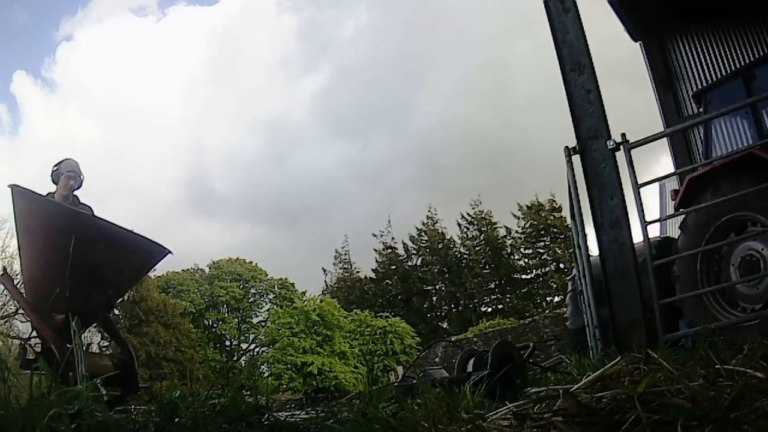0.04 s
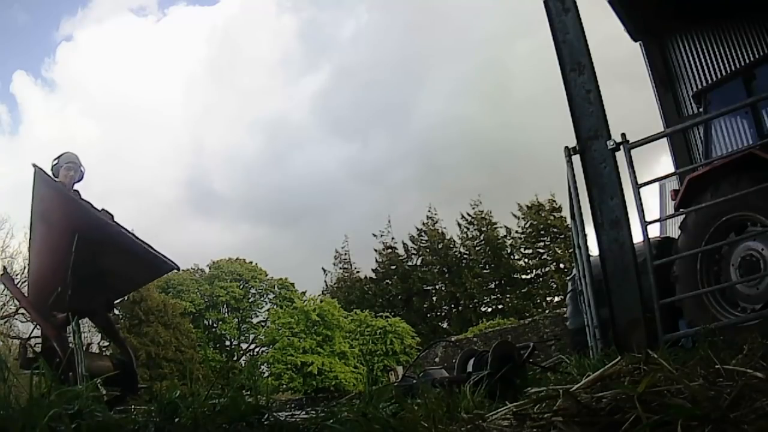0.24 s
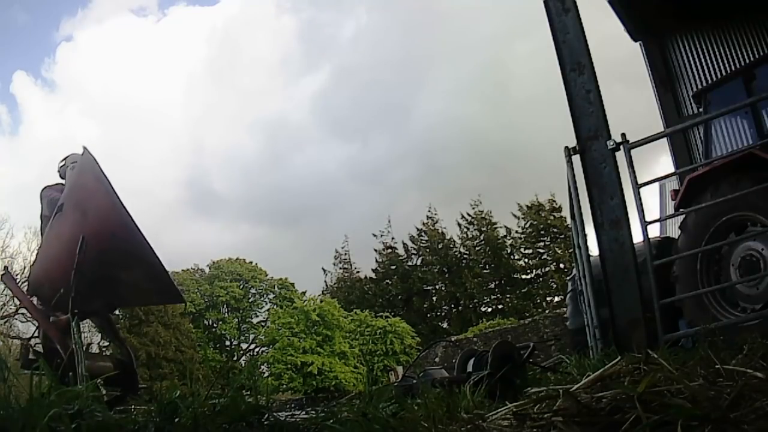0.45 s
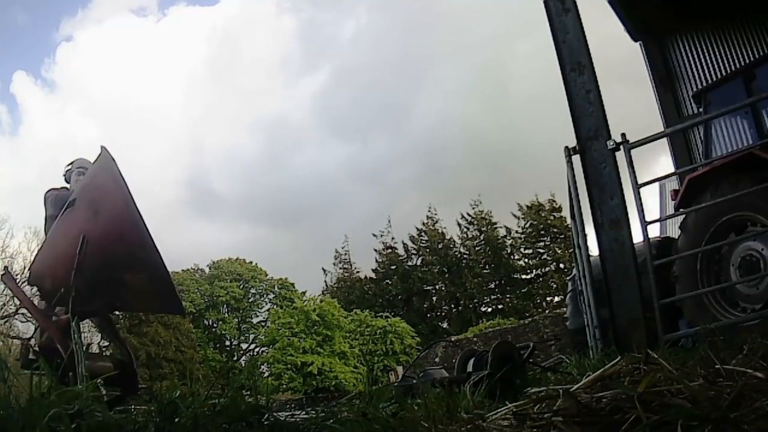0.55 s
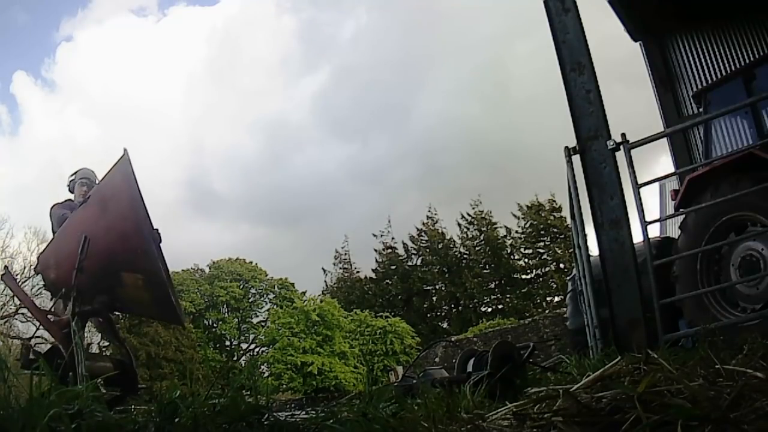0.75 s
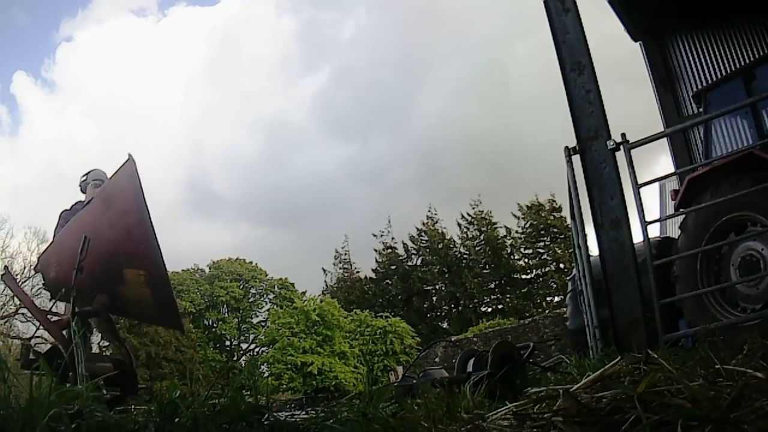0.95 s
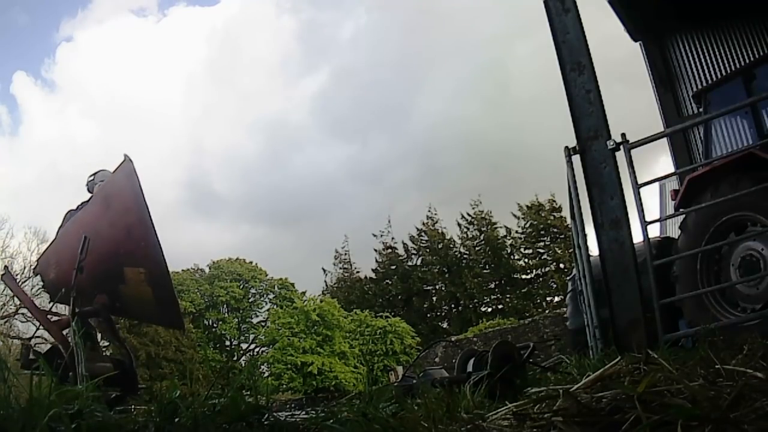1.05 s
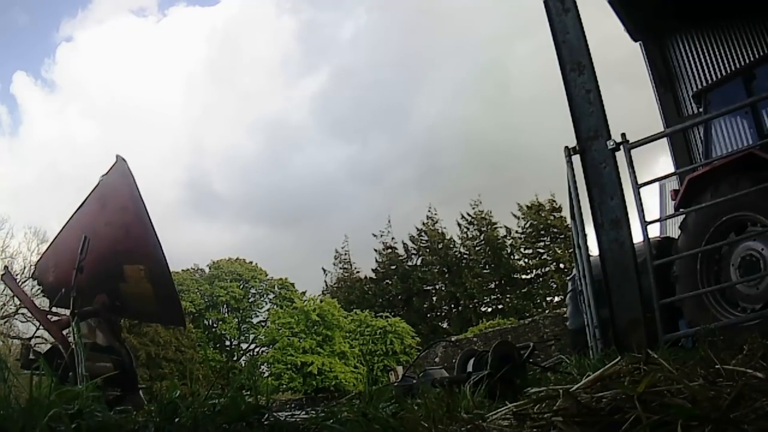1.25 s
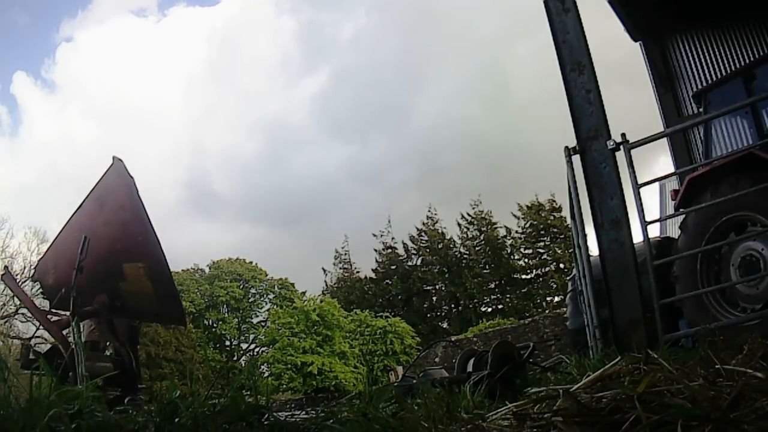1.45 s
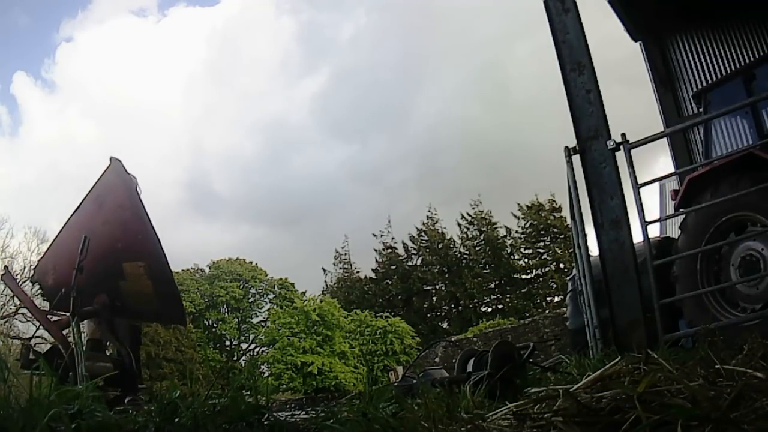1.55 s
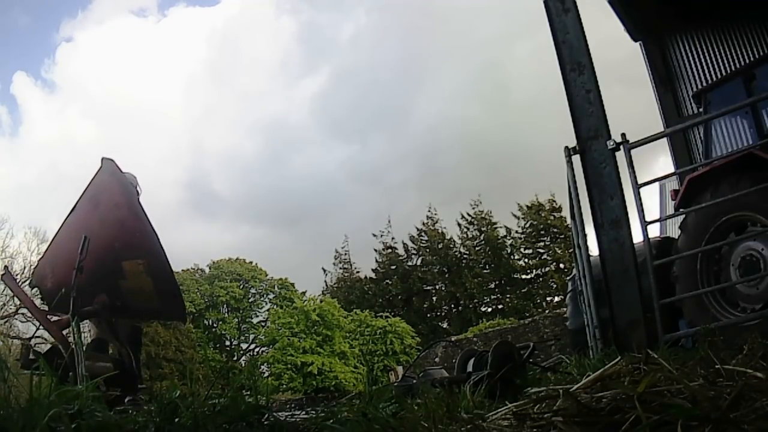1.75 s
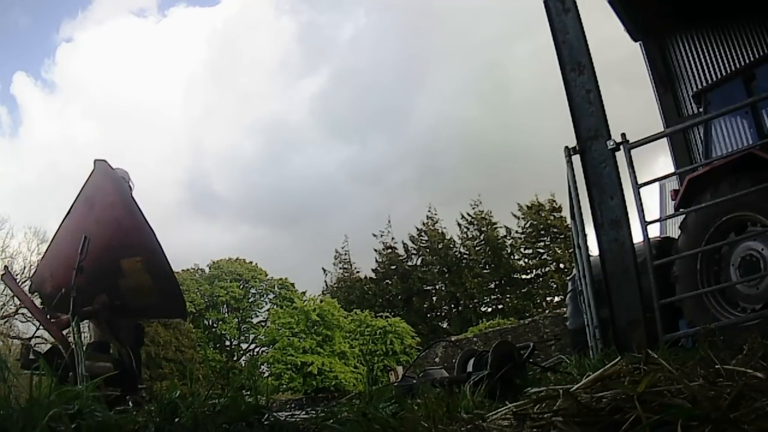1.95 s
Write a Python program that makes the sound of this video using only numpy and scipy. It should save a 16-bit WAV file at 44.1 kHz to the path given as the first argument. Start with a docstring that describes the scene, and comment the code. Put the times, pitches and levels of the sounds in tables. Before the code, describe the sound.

A heavy metal hopper tips over with a ringing clang, then settles with a deeper boom.

```python
"""A heavy sheet-steel hopper is tipped over outdoors: it knocks twice, the second time hard, and rattles out.
Each impact radiates a crack and excites the damped modes of the steel, which beat in close pairs.
Half a second later it settles with a deeper boom, since softer pushes excite mainly the low modes.
Light taps and clinks, the rumble of the flexing sheet and faint squeaks and rustles go with the fall.
Faint wind and a low distant hum lie underneath."""
import sys
import numpy as np
from scipy import signal
from scipy.fft import rfft, irfft
from scipy.io import wavfile
from scipy.ndimage import uniform_filter1d

SR = 44100
rng = np.random.default_rng(int(sys.argv[2]) if len(sys.argv) > 2 else 0)


def to_wav(s):
    """Save 16-bit WAV."""
    ch = np.atleast_2d(s).T  # columns
    pcm = np.round(np.clip(ch, -1, 1) * 32767)  # PCM
    wavfile.write(sys.argv[1], SR, pcm.astype(np.int16))


N = 88200
T = np.arange(N) / SR
BIN_HZ = np.fft.rfftfreq(N, 1 / SR)

# hard knocks as the hopper goes over: start_s, crack_gain_db, ring_gain_db, tilt_db_per_octave
KNOCKS = [(0.2346, -9, -8, 3.5), (0.262, -15.5, -6.5, -1), (0.2787, 1, 0.5, 1.5), (0.297, -11.5, -11.5, 3),
          (0.359, -31, -29, -8), (0.444, -18, -16, 0.5), (0.494, -22.5, -22.5, 6)]
# dull bumps as it starts to tip and as it settles: start_s, gain_db, tilt_db_per_octave
BUMPS = [(0.118, -13, -0.5), (0.761, 2.5, 2), (0.790, 1, 0.5), (0.814, -2.5, -3.5), (0.879, -7.5, 1),
         (0.956, -9.5, -6), (1.014, -14, -5), (1.101, -31.5, 5)]
# strong modes of the hopper: pitch_hz, t60_s, knock_gain_db, bump_gain_db
HOPPER_MODES = [(125.3, 0.52, -10, -16), (138.8, 1.3, -13, -2.5), (233.7, 1.1, -18.5, 1.5),
                (262.3, 1.77, -5, -1.5), (291.2, 0.72, -1.5, -15.5), (339, 0.697, -2, -8.5),
                (366.3, 0.99, -4, -1), (419, 0.79, -10.5, -25), (432.6, 0.89, 2, -7.5),
                (592, 1.44, -13, -1), (609.4, .8, -2.5, -16.5), (622, .4, -3.5, -15.5),
                (710, 0.34, 5.5, -25.5), (807, .7, -7.5, -10), (1001, .5, -1.5, -20),
                (1094, 0.16, 6.5, -5.5), (1118, .5, 3, -18), (1184, 0.47, -2, -31), (1327, .6, -8, -27.5),
                (1558, 0.6, -13.5, -16), (1545, .45, -4.5, -17), (1913, 0.85, -21.5, -34.5),
                (2125, .7, -13.5, -38.5), (3510, 1.0, -25.5, -33), (6560, 1.0, -41, -58)]
# spectra of the dense plate modes in a knock and in a bump: frequency_hz, gain_db
KNOCK_SPECTRUM = [(30, -55), (60, -23.5), (115, -12), (200, -9), (330, -2), (520, -2), (850, -5),
                  (1130, -13), (1330, -7.5), (1700, -12.5), (2600, -24.5), (4300, -32), (5400, -42),
                  (7500, -41), (9500, -47.5), (11000, -73.5)]
BUMP_SPECTRUM = [(30, -58.5), (70, -29.5), (135, -3.5), (190, -13), (260, -4), (560, -5), (700, -6),
                 (1070, -8), (1250, -13.5), (1650, -18), (2300, -22), (4200, -32.5), (5500, -39),
                 (7800, -40), (10500, -62.5)]
# decay times of those modes: frequency_hz, t60_s
KNOCK_DECAY = [(100, 0.97), (300, 0.99), (700, 0.7), (1300, 0.68), (3000, 0.77), (9000, 0.37)]
BUMP_DECAY = [(100, 0.85), (300, 1.45), (650, 0.72), (1300, .55), (3000, 0.49), (8000, 0.35)]
# broad resonances of the walls and the dips between them: centre_hz, width_hz, gain_db
WALL_RESONANCES = [(385, 100, 3), (480, 60, -3), (665, 130, 3.5), (860, 90, -4), (1110, 190, 5),
                   (1350, 110, -4), (1590, 180, 4)]
# light edge taps before the hopper lands: start_s, pitch_hz, width_octaves, level_db
TAPS = [(0.199, 926, 0.65, -35), (0.22, 1100, 0.8, -36.5), (0.229, 950, 0.79, -23),
        (0.666, 575, 0.84, -37.5), (0.7425, 1410, 0.49, -39)]
# clinks of loose metal: start_s, gain_db
CLINKS = [(0.233, -3), (0.257, -2), (0.278, -5.5), (0.494, -2.5), (0.5, 3.5), (0.742, -6), (0.759, 0.5),
          (0.791, -1), (1.099, -25.5)]
# rumbles of the flexing sheet: start_s, length_s, level_db
FLEXES = [(0.091, 0.1, -55.5), (0.185, 0.26, -45), (.64, 0.13, -47.5)]
# soft rustles: start_s, length_s, level_db
RUSTLES = [(-0.08, 0.44, -60), (1.766, 0.11, -71), (1.851, 0.14, -74.5)]
# rising squeaks: start_s, length_s, from_hz, to_hz, level_db
SQUEAKS = [(1.096, 0.056, 2100, 2260, -75), (1.181, 0.11, 2120, 2260, -82.5),
           (1.365, .09, 1550, 1800, -79.5), (1.435, 0.095, 1650, 1950, -81)]
# spectra of the contact crack, clinks, flexing sheet, rustles and wind: frequency_hz, gain_db
CRACK_SPECTRUM = [(60, -28), (300, -14.5), (650, 8), (1100, 6), (1700, -3), (2600, -22), (5000, -39.5),
                  (9000, -43.5), (12000, -55.5)]
CLINK_SPECTRUM = [(1500, -23), (4000, 1), (5400, -4.5), (6700, 5), (8200, -7), (10000, -21.5),
                  (11500, -25.5), (13000, -20)]
FLEX_SPECTRUM = [(40, -31.5), (75, -13), (115, -3.5), (175, -3.5), (260, -20.5), (400, -37.5), (2000, -80)]
RUSTLE_SPECTRUM = [(150, -5), (500, 15.5), (1100, 3), (2200, -9), (3000, -17.5), (10000, -38)]
WIND_SPECTRUM = [(18, -66), (30, -36.5), (55, -6.5), (98, -24), (143, -4.5), (167, -18), (215, 0.5),
                 (425, -11.5), (494, -2.5), (533, -8.5), (704, -7), (883, -11.5), (1320, -21),
                 (2610, -33.5), (12500, -37.5), (16200, -63), (22000, -120)]
# partials of the distant hum: pitch_hz, level_db
HUM_PARTIALS = [(66, -80), (209, -72.5), (296, -73.5), (505, -73), (696, -79)]


def knocks(crack_db=-2, plate_db=-21.5, modes_db=-30.5, overtones_db=-45.5, clash_db=-17):
    """Impact excitation: each knock cracks, clashes briefly and leaves the steel in free vibration."""
    hz, t60, mode_db, _ = np.array(HOPPER_MODES).T
    modes = undb(modes_db) * beating_modes(hz, t60, mode_db) + undb(overtones_db) * overtones()
    pulse = undb(crack_db) * crack()
    strike = wall_echoes(pulse)
    response = steel_response()
    bloom = 1 - np.exp(-T / 0.0042)  # the ring builds up over a few milliseconds
    out = 0
    for start, crack_gain_db, ring_gain_db, tilt in KNOCKS:
        wash = filtered_noise(response)
        clash = unit(signal.fftconvolve(rng.standard_normal(N), pulse)[:N]) * decay(t60=0.28)
        body = undb(plate_db) * plate(wash, KNOCK_DECAY) + modes + undb(clash_db) * clash
        ring = undb(ring_gain_db) * tilted(body, tilt) * bloom
        out += delay(undb(crack_gain_db) * strike + ring, start)
    return out


def crack(size=2048, bounce_s=0.0017, bounce_db=-7):
    """A contact radiates a minimum-phase pulse, followed by its ground reflection; peak 1."""
    gain = undb(with_walls(CRACK_SPECTRUM, np.fft.rfftfreq(size, 1 / SR)))
    cepstrum = irfft(np.log(gain))
    cepstrum[1:size // 2] *= 2  # folding the cepstrum makes the pulse causal
    cepstrum[size // 2 + 1:] = 0
    pulse = np.pad(irfft(np.exp(rfft(cepstrum))), (0, N - size))
    pulse = pulse + undb(bounce_db) * delay(pulse, bounce_s)
    return pulse / np.abs(pulse).max()


def wall_echoes(pulse, trip_s=0.0021, trip_db=-11.5):
    """Multiple reflection: the struck wall returns the pulse twice, weaker on each round trip."""
    return sum(undb(trip * trip_db) * delay(pulse, trip * trip_s) for trip in range(3))


def beating_modes(hz, t60, db, split_hz=6.5, twin_db=-8.5):
    """Beating: each damped mode interferes with a weaker twin slightly higher in pitch."""
    twin_hz = hz + split_hz * rng.uniform(0.5, 1.5, len(hz))
    out = 0
    for k in range(len(hz)):
        pair = np.sin(2 * np.pi * hz[k] * T) - undb(twin_db) * np.sin(2 * np.pi * twin_hz[k] * T)
        out += (-1) ** k * undb(db[k]) * decay(t60[k]) * pair  # neighbours swing in opposition
    return out


def overtones(count=70, low_hz=1401, high_hz=7920):
    """Light damping lets sparse high modes outlast the clash."""
    place, strength, phase = rng.random((count, 3)).T
    hz = low_hz * (high_hz / low_hz) ** place
    amplitude = strength * undb(lookup(KNOCK_SPECTRUM, hz)) * hz
    spectrum = np.zeros(N // 2 + 1, complex)
    spectrum[(hz * N / SR).astype(int)] = amplitude * np.exp(2j * np.pi * phase)
    return unit(irfft(spectrum, N)) * decay(t60=0.8)


def plate(wash, decay_table):
    """Modal overlap: dense plate modes merge into noise, each band decaying at its own rate."""
    spectrum = rfft(wash)
    centres, t60s = np.array(decay_table).T
    bands = [lookup(np.c_[centres, share], BIN_HZ) for share in np.eye(len(t60s))]
    return sum(irfft(spectrum * band, N) * decay(t60) for band, t60 in zip(bands, t60s))


def steel_response(spacing_hz=9.6, ripple_db=1, full_ripple_hz=1500):
    """Frequency response of the walls, rippled where the finer modes bunch at random."""
    bins = len(BIN_HZ)
    ripple = np.sqrt(3) * np.interp(BIN_HZ / spacing_hz, np.arange(bins), rng.uniform(-1, 1, bins))
    depth_db = ripple_db * np.minimum(BIN_HZ / full_ripple_hz, 1)
    return undb(with_walls(KNOCK_SPECTRUM, BIN_HZ) + depth_db * ripple)


def with_walls(spectrum, hz):
    """Wall resonance adds broad peaks and dips to a spectrum in dB."""
    peaks = sum(db * np.exp(-2 * ((hz - centre) / width) ** 2) for centre, width, db in WALL_RESONANCES)
    return lookup(spectrum, hz) + peaks


def rattle(start_s=0.283, contacts_per_s=170, scatter_db=3, gain_db=-24):
    """A Poisson train of ever weaker contacts: the hopper chatters after the hardest knock."""
    contacts = (rng.random(N) < contacts_per_s / SR) * rng.choice([-1, 1], N)
    strength = undb(scatter_db * rng.standard_normal(N)) * decay(t60=0.19)
    chatter = signal.fftconvolve(contacts * strength, crack())[:N]
    return undb(gain_db) * delay(chatter, start_s)


def bumps(crack_db=-33.5, plate_db=-40, modes_db=-46, bloom_s=0.0085):
    """Contact time limits bandwidth: softer, longer pushes excite mainly the low modes."""
    hz, t60, _, mode_db = np.array(HOPPER_MODES).T
    modes = undb(modes_db) * beating_modes(hz, t60, mode_db)
    pulse = undb(crack_db) * crack()
    bloom = 1 - np.exp(-T / bloom_s)
    out = 0
    for start, gain_db, tilt in BUMPS:
        wash = unit(tilted(noise(BUMP_SPECTRUM), tilt))
        body = undb(plate_db) * plate(wash, BUMP_DECAY) + modes
        out += undb(gain_db) * delay(pulse + body * bloom, start)
    return out


def taps(attack_s=0.0023):
    """Band-limited excitation: an edge touches and clanks briefly around one pitch."""
    envelope = decay(t60=0.12) * (1 - np.exp(-(T / attack_s) ** 2))
    out = 0
    for start, pitch, width, db in TAPS:
        band = 1 / (1 + (np.log2((BIN_HZ + 1) / pitch) / width) ** 4)
        out += delay(undb(db) * filtered_noise(band) * envelope, start)
    return out


def clinks(level_db=-50.5):
    """Rapid damping: the bright contacts of loose metal die at once."""
    envelope = decay(t60=0.037)
    return sum(delay(undb(level_db + db) * noise(CLINK_SPECTRUM) * envelope, s) for s, db in CLINKS)


def flex():
    """Flexural vibration: the sheet rumbles softly as it takes the strain."""
    return sum(undb(db) * swell(start, length) for start, length, db in FLEXES) * noise(FLEX_SPECTRUM)


def rustles():
    """Amplitude envelopes shape broadband noise into soft rustles."""
    return sum(undb(db) * swell(start, length) * noise(RUSTLE_SPECTRUM) for start, length, db in RUSTLES)


def squeaks(roughness_hz=450):
    """Random modulation spreads each rising tone into a rough, narrow band."""
    out = 0
    for start, length, from_hz, to_hz, db in SQUEAKS:
        phase = phase_of(np.interp(T, [start, start + length], [from_hz, to_hz]))
        rough_tone = wander(roughness_hz) * np.sin(phase) + wander(roughness_hz) * np.cos(phase)
        out += undb(db) * swell(start, length) * unit(rough_tone)
    return out


def wind(level_db=-64, gust_db=0.5):
    """Light wind is low-pitched noise, amplitude-modulated by slight gusts."""
    return undb(level_db + gust_db * wander(rate_hz=7.6)) * noise(WIND_SPECTRUM)


def hum(flutter_db=1.5, waver_hz=1.1):
    """Slow amplitude and frequency modulation make each partial of the distant hum waver."""
    out = 0
    for hz, db in HUM_PARTIALS:
        amplitude = np.sqrt(2) * undb(db + flutter_db * wander(rate_hz=13))
        out += amplitude * np.sin(phase_of(hz + waver_hz * wander(rate_hz=10)))
    return out


def undb(db):
    """Decibels to amplitude ratio."""
    return 10 ** (np.asarray(db) / 20)


def unit(x):
    """Normalisation to rms 1."""
    return x / np.sqrt(np.mean(x ** 2))


def lookup(table, hz):
    """Interpolation on a log-frequency axis."""
    frequencies, values = np.array(table).T
    return np.interp(np.log(np.maximum(hz, 1)), np.log(frequencies), values)


def decay(t60):
    """Exponential decay, 60 dB down after t60 seconds."""
    return np.exp(-np.log(1000) * T / t60)


def swell(start, length):
    """Half-sine envelope."""
    return np.sin(np.pi * np.clip((T - start) / length, 0, 1))


def delay(x, seconds):
    """Pure time delay."""
    return np.concatenate([np.zeros(int(seconds * SR)), x])[:N]


def phase_of(hz):
    """Phase is the time integral of frequency."""
    return 2 * np.pi * np.cumsum(hz) / SR


def filtered_noise(gain):
    """White noise weighted by a gain per frequency bin, rms 1."""
    return unit(irfft(rfft(rng.standard_normal(N)) * gain, N))


def noise(spectrum):
    """Noise with a tabulated spectrum, rms 1."""
    return filtered_noise(undb(lookup(spectrum, BIN_HZ)))


def tilted(x, db_per_octave):
    """Spectral tilt about 1 kHz brightens or dulls a sound."""
    octaves = np.log2(np.clip(BIN_HZ, 125, 4000) / 1000)
    return irfft(rfft(x) * undb(db_per_octave * octaves), N)


def wander(rate_hz):
    """Smoothed random steps, rms 1."""
    hold = int(SR / rate_hz)
    steps = np.repeat(rng.standard_normal(N // hold + 1), hold)
    return unit(uniform_filter1d(uniform_filter1d(steps, hold), hold)[:N])


def scene():
    """Superposition of the hopper and its open-air background, in mono."""
    hopper = flex() + taps() + knocks() + rattle() + bumps() + clinks()
    return (hopper + rustles() + squeaks() + wind() + hum())[None]


def record(dry):
    """Elliptic low-pass filtering removes the treble above 12.6 kHz."""
    return signal.sosfilt(signal.ellip(8, 0.2, 70, 12600, fs=SR, output="sos"), dry)


dry = scene()
out = record(dry)
to_wav(out)
```